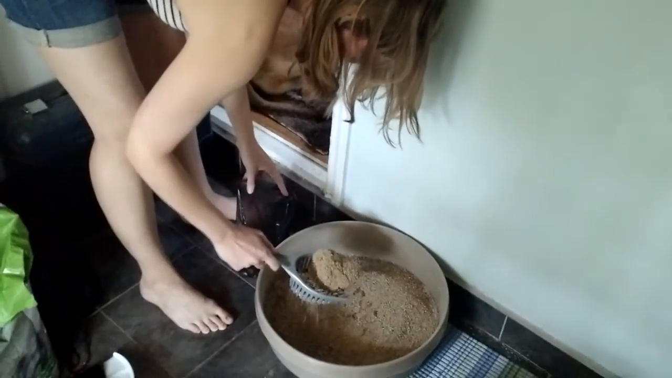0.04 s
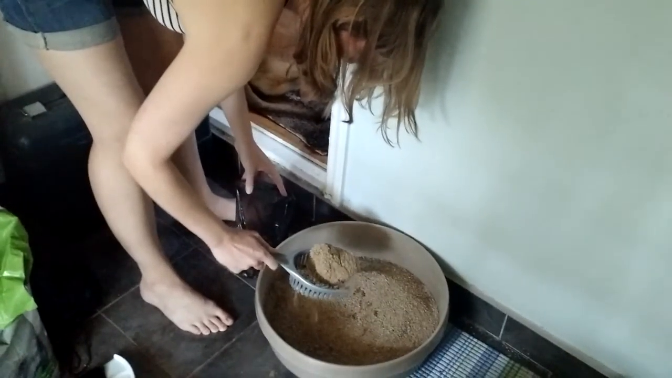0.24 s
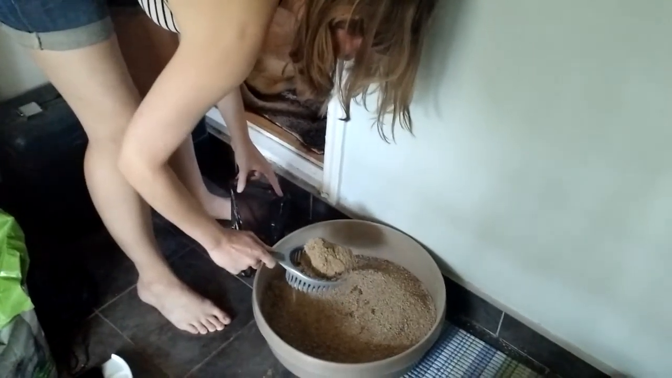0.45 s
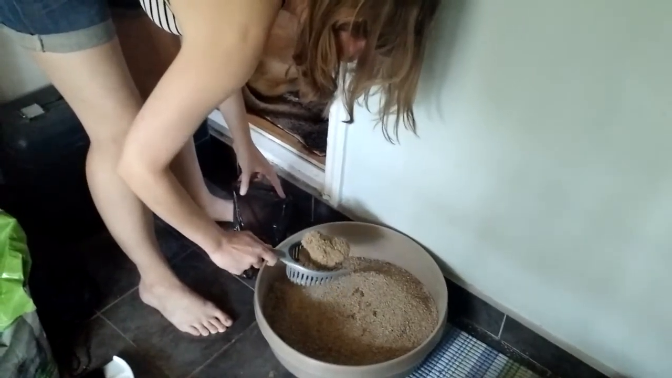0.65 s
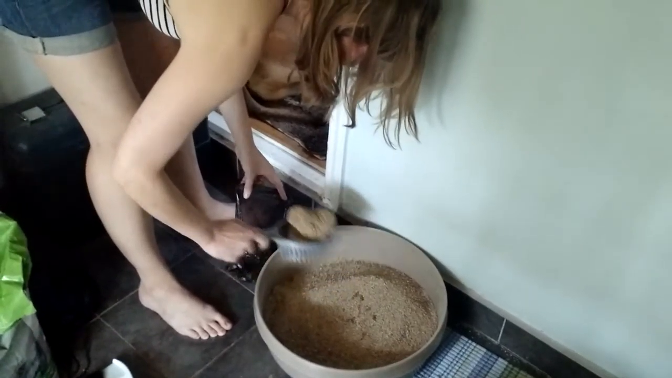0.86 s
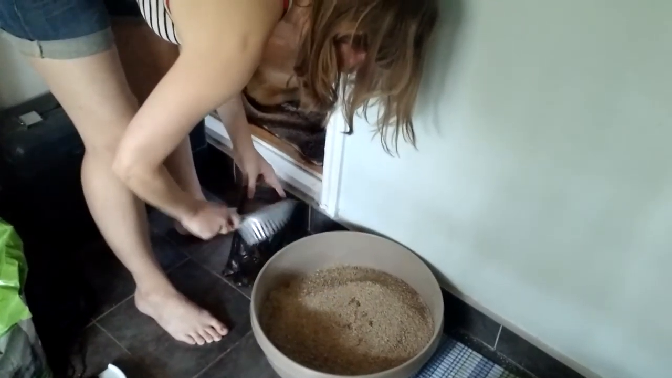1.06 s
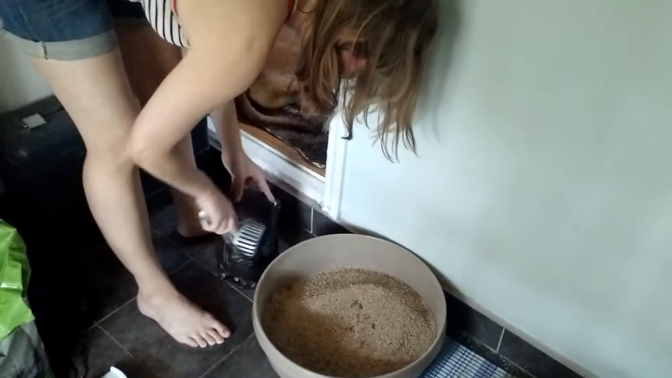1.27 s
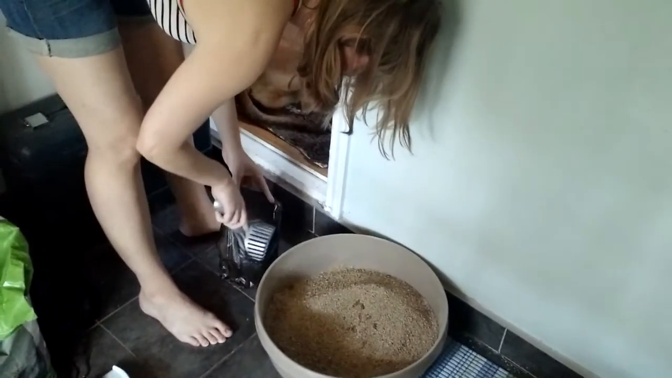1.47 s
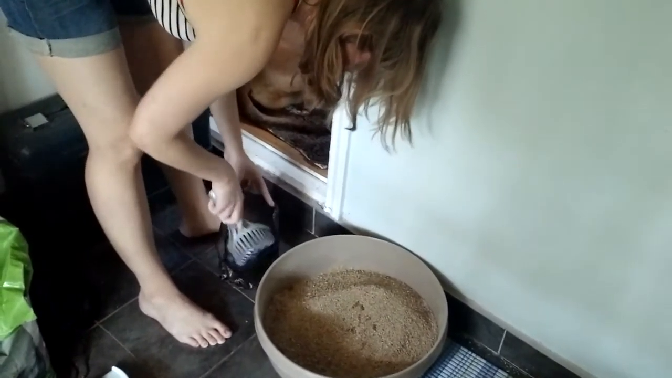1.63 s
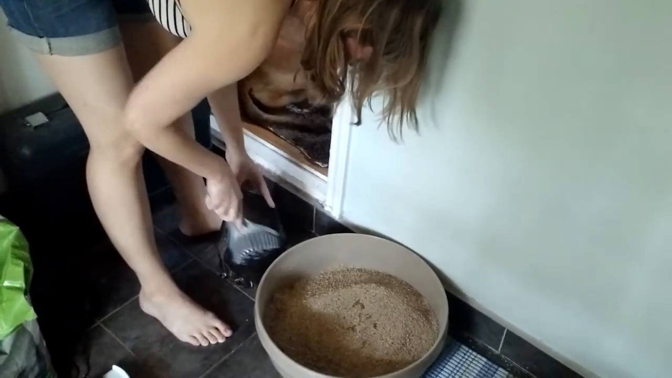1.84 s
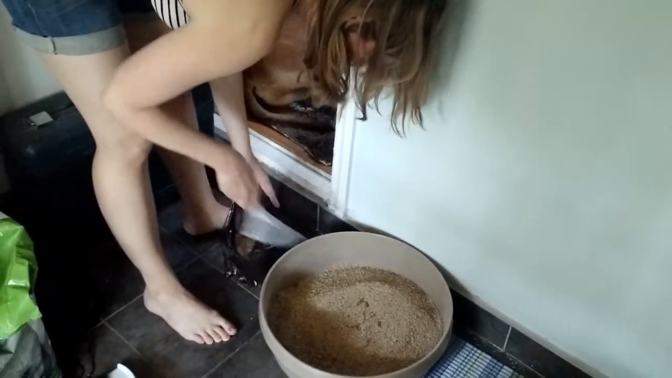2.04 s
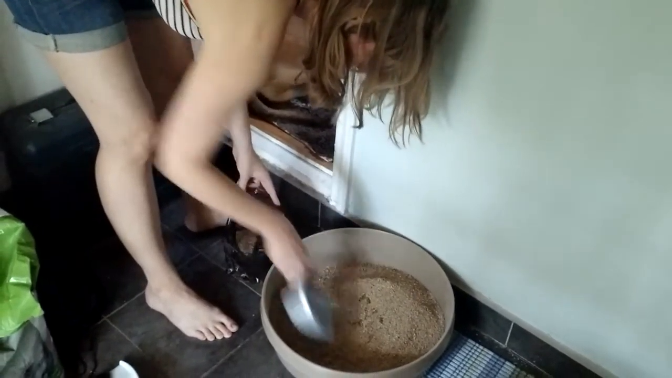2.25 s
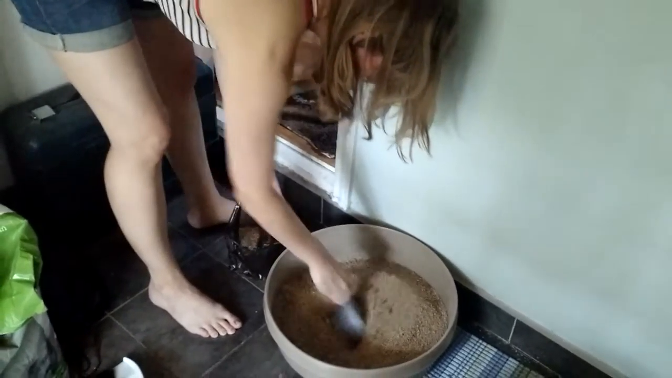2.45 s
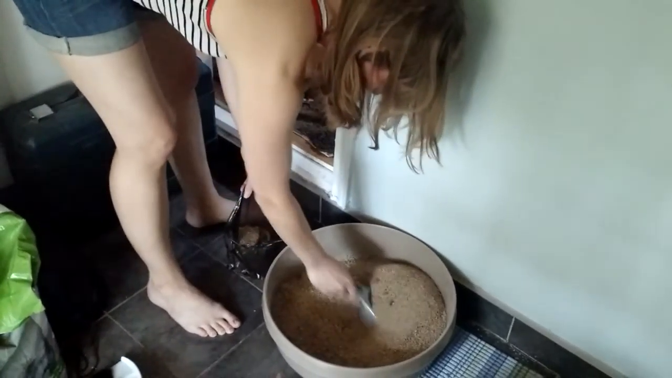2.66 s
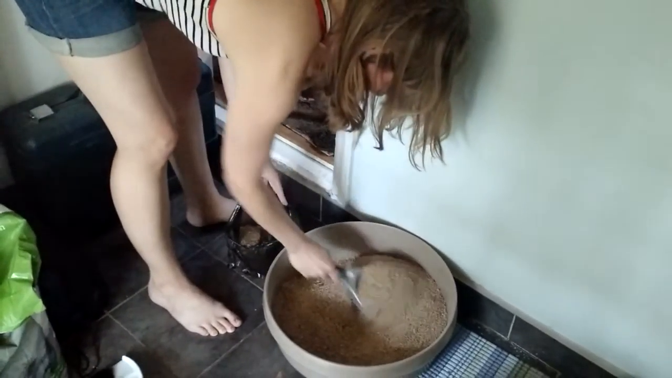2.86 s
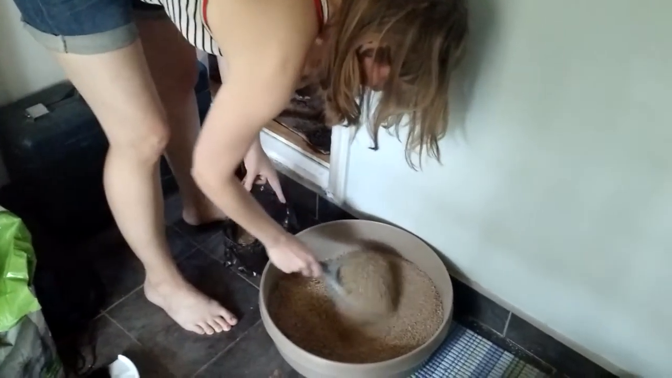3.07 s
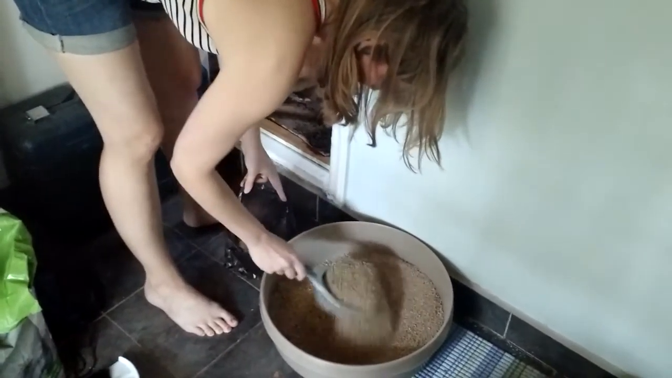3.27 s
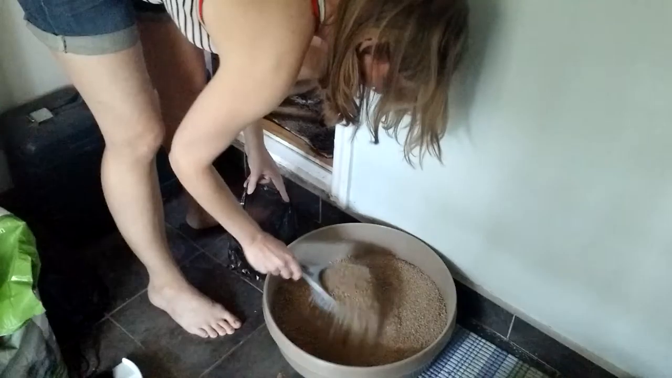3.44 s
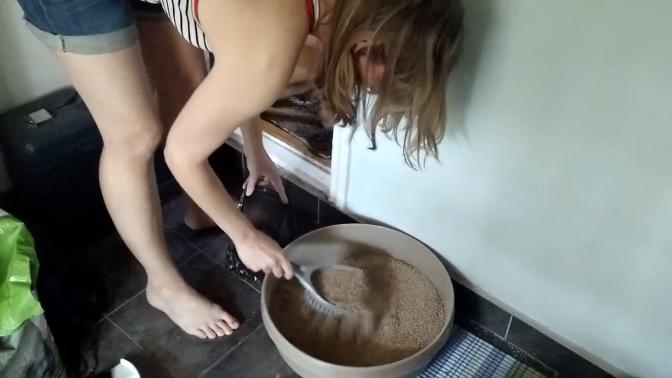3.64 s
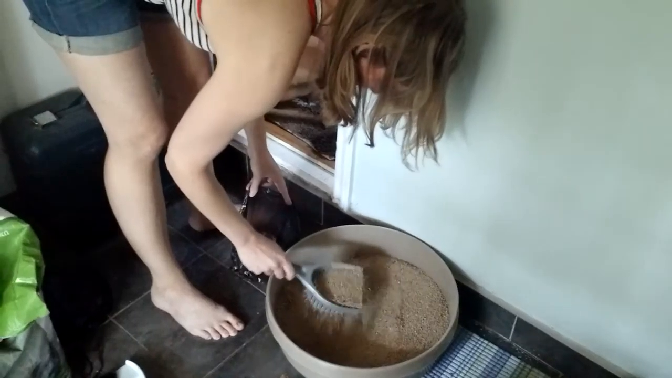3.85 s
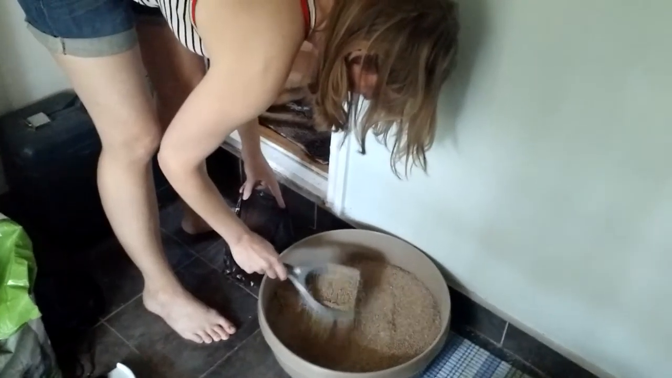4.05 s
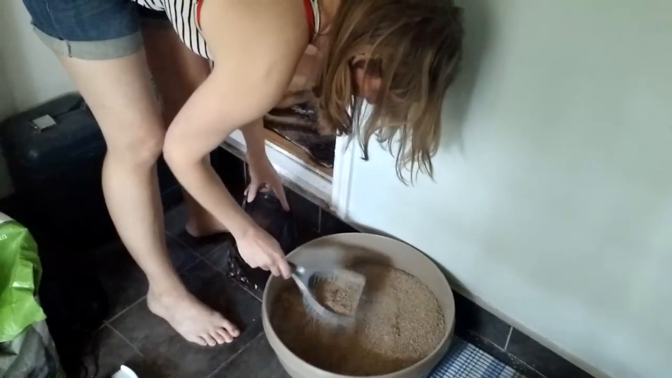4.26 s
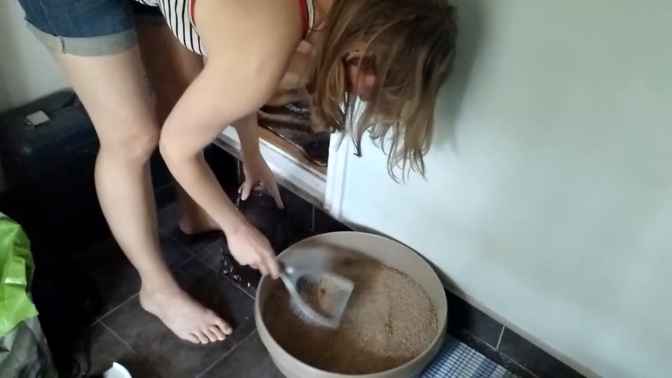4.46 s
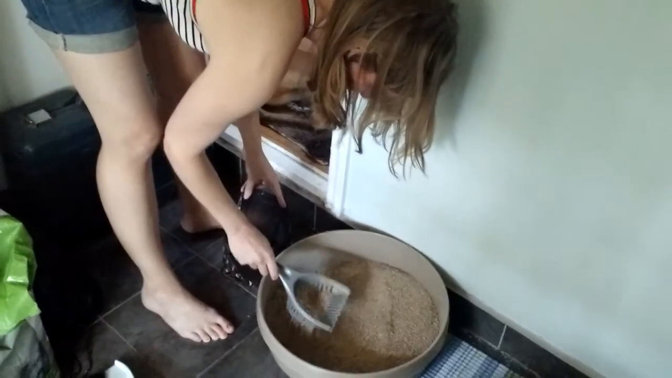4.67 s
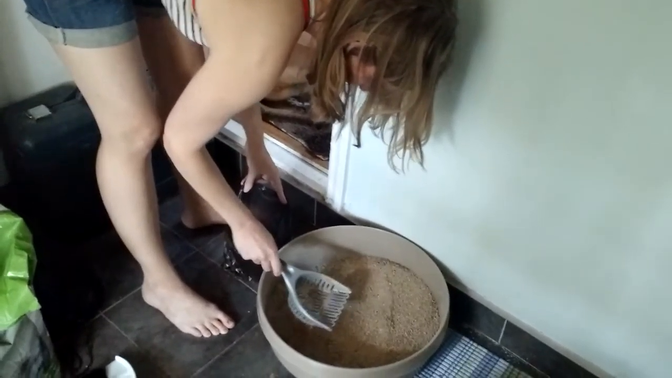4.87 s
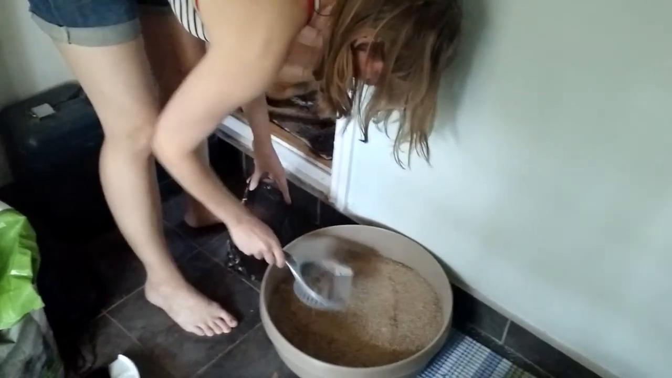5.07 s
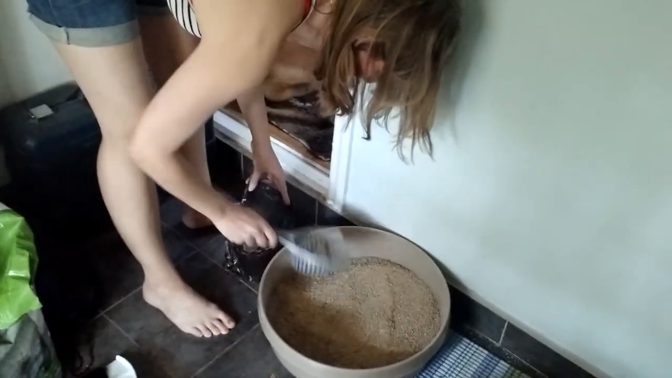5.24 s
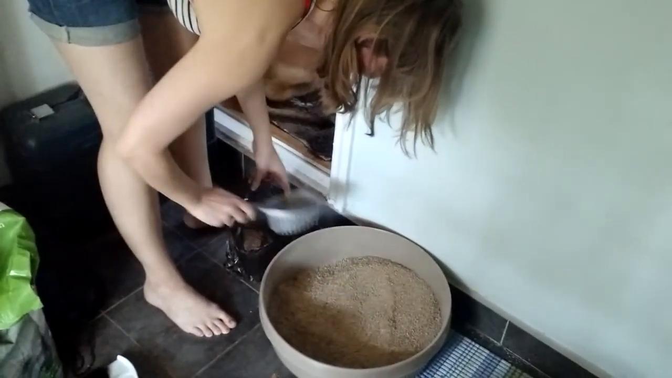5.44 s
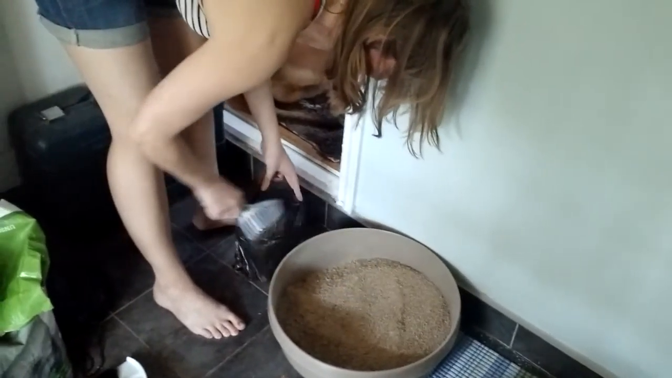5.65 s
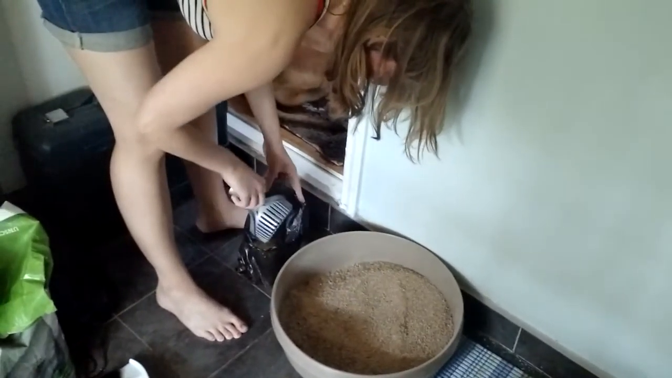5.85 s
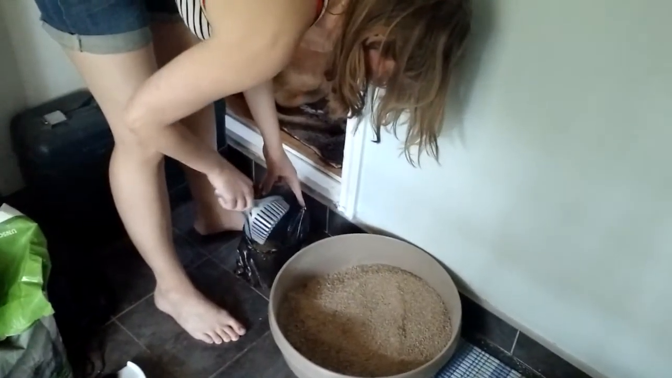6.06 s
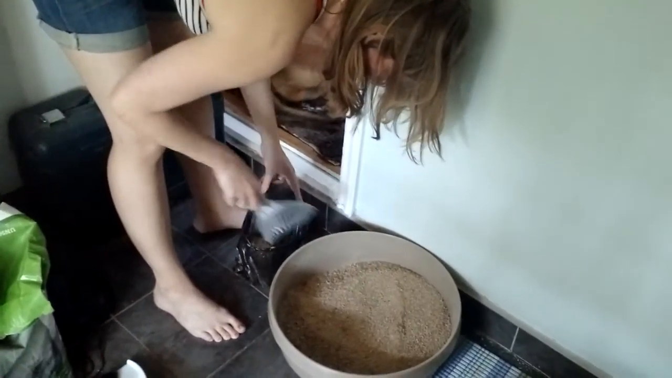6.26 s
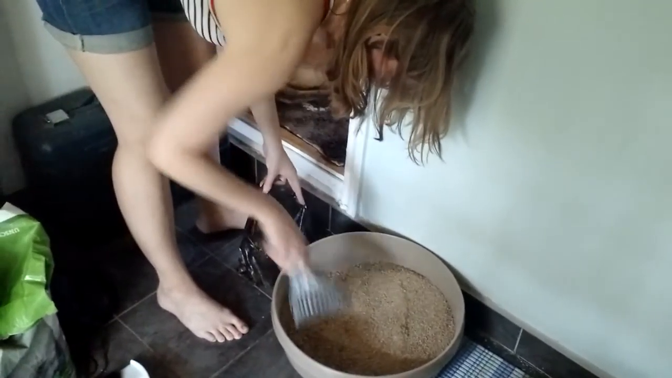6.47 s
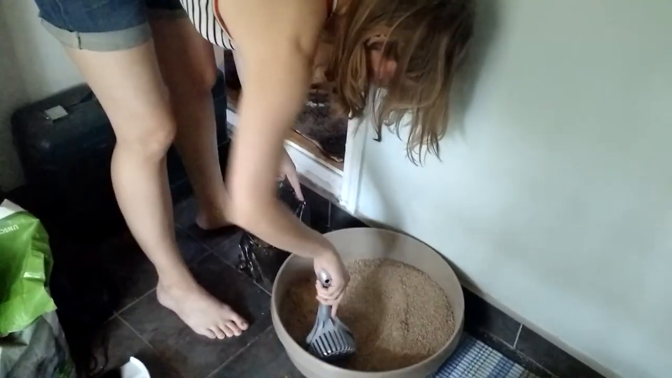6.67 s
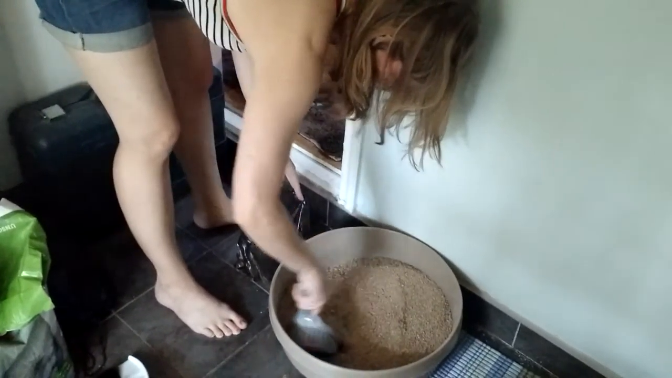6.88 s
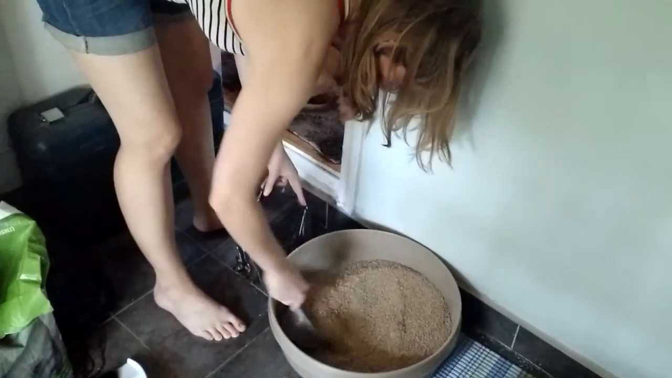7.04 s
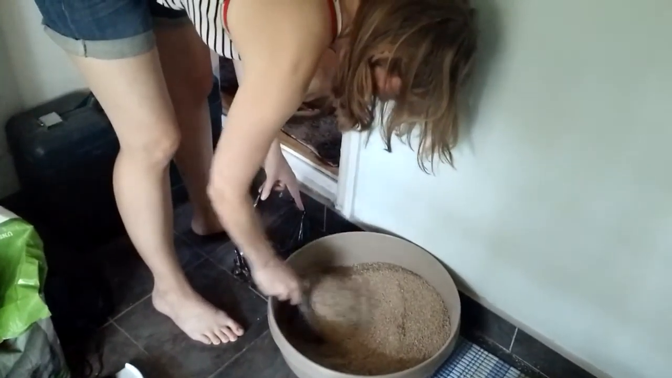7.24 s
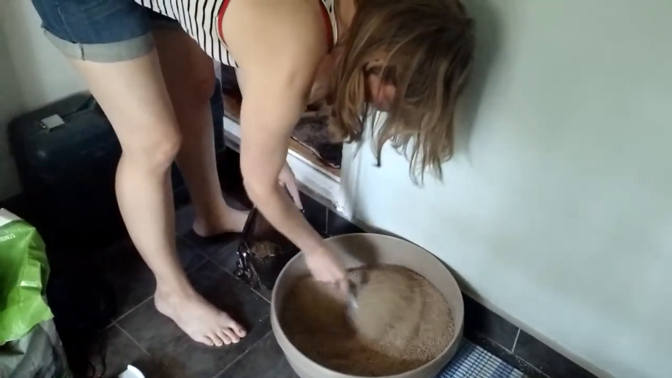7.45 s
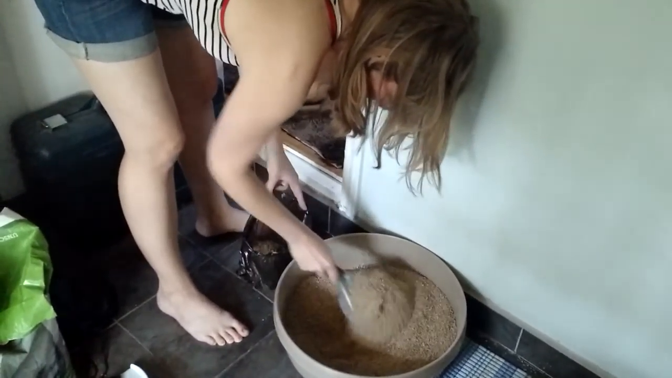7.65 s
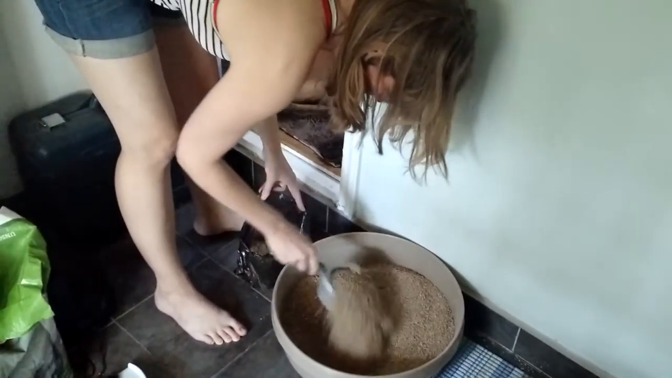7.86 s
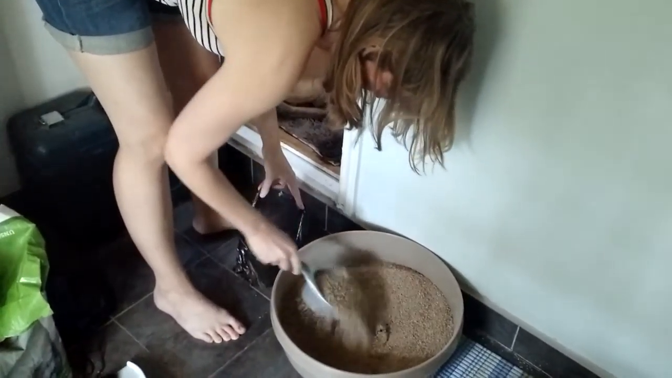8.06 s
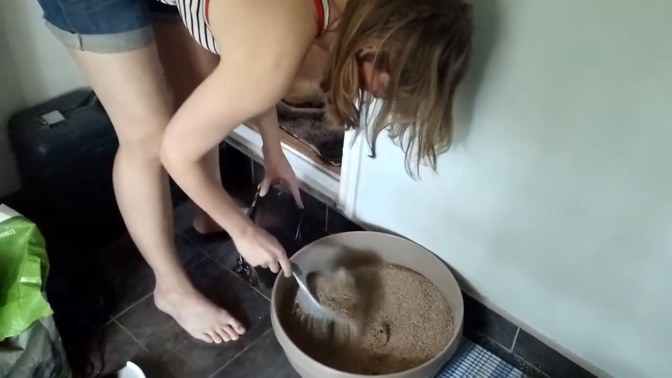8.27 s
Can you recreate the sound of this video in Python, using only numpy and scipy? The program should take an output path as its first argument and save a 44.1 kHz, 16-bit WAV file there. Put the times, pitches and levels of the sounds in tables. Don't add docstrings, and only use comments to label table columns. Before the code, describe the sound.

A slotted metal scoop works through a bowl of dry, coarse grains. Grit spills off in bright bursts, the edge cracks against the bowl and scrapes in, then quick wrist shakes make fine grains patter through the slots. After a lull the load is tipped out, and the scoop strikes and rakes the bed roughly. Near microphone, short dry indoor reflections, light background hiss.

```python
import sys
import numpy as np
from scipy import signal
from scipy.fft import rfft, irfft, next_fast_len
from scipy.io import wavfile

SR = 44100
rng = np.random.default_rng(int(sys.argv[2]) if len(sys.argv) > 2 else 0)


def wrap_up_sound(samples):
    columns = np.atleast_2d(samples).T
    tamed = np.clip(columns, -1, 1)
    steps = np.round(tamed * 32767).astype(np.int16)
    wavfile.write(sys.argv[1], SR, steps)


def volts_from_decibels(level):
    exponent = np.asarray(level, float) / 20
    return 10 ** exponent


N = 366471


def rms_one(x):
    return x / np.sqrt(np.mean(x ** 2) + 1e-20)


def at_hz(points, hz):
    points = np.array(points)
    return np.interp(np.log(hz), np.log(points[:, 0]), points[:, 1])


def drift(rate):
    step = 40
    r = np.exp(-2 * np.pi * step * rate / SR)
    noise = rng.standard_normal(N // step + 2002)
    slow = signal.lfilter([1], [1, -2 * r, r * r], noise)[2000:]
    return np.interp(np.arange(N) / step, np.arange(len(slow)), rms_one(slow))


def ring(clicks, hz, t60):
    r, w = volts_from_decibels(-60 / (t60 * SR)), 2 * np.pi * hz / SR
    return signal.lfilter([0, np.sin(w)], [1, -2 * r * np.cos(w), r * r], clicks + 1e-18)


def at_ports(common, apart, hz):
    # f/Hz, likeness (1 alike, -1 opposed)
    likeness = [(200, 1), (700, 1), (1400, 0.48), (2100, 0.037), (2700, 0.46), (3400, 0.43), (4200, -0.28),
                (6000, 0.088)]
    alike = np.clip(at_hz(likeness, hz), -1, 1)
    return np.sqrt(1 + alike) * common + np.sqrt(1 - alike) * apart * [[1], [-1]]


def grit(spectrum, per_s, uneven_db, cycles, clump_db, count):
    sizes_db = uneven_db * np.minimum(rng.exponential(1, (2, N)), 5)
    sizes = volts_from_decibels(sizes_db) * rng.choice([-1, 1], (2, N))
    collides = rng.random((2, N)) < per_s / SR
    hits = sizes * collides * volts_from_decibels(clump_db * drift(12.2))
    pitch_index = rng.integers(0, count, (2, N))
    out = 0
    for k, hz in enumerate(np.geomspace(spectrum[0][0], spectrum[-1][0], count)):
        common, apart = ring(hits * (pitch_index == k), hz, cycles / hz)
        out = out + volts_from_decibels(at_hz(spectrum, hz)) * hz * at_ports(common, apart, hz)
    return rms_one(out)


def surges(rows, mix_db, lean, t):
    s, db, rise, fall, colour_db = np.transpose(rows)[:, :, None]
    span = np.maximum(np.where(t < s, rise, fall), .004)
    roundness = 1.24
    power = volts_from_decibels(db - 20 * np.abs((t - s) / span) ** roundness) ** 2
    size_db = np.array(mix_db)[:, None] + np.outer(lean, colour_db)
    return volts_from_decibels(size_db) ** 2 @ power


def hiss():
    # f/Hz, level/dB per Hz
    noise_density = [(8, -9), (17, 0), (35, -5.5), (47, -19), (57, -9), (95, -24), (125, -16.5),
                     (152, -24.5), (200, -22.5), (450, -27), (1000, -40), (2500, -48), (6000, -38.5),
                     (16000, -42)]
    hz = np.maximum(np.arange(N // 2 + 1) * SR / N, 1)
    white = rfft(rng.standard_normal((2, N)))
    return volts_from_decibels(-52) * rms_one(irfft(white * volts_from_decibels(at_hz(noise_density, hz)), N))


def settling():
    stir_db = [-72.5, -73, -82, -88]
    return volts_from_decibels(np.array(stir_db)[:, None]) ** 2


def pouring(t):
    # t/s of the peak, level/dB, rise/s, fall/s, coarseness/dB
    slides = [(0.1, -69, 0.33, 1, -3), (0.34, -58, 0.11, 0.16, -5), (0.86, -56.5, .1, 0.43, -9),
              (1.035, -36.5, 0.048, 0.26, -1), (1.155, -33.5, 0.16, 0.17, 5),
              (1.36, -42.5, 0.35, 0.16, 0.5), (1.55, -48.5, 0.45, 0.3, 2), (1.68, -42.5, 0.12, 0.058, -3.5),
              (1.75, -42.5, 0.11, 0.16, -2.5), (1.84, -49.5, 0.25, 0.32, 1), (2.1, -63, 0.053, 0.18, 11.5),
              (3.0, -57, 0.41, 0.066, -24), (3.2, -54, 0.16, 0.32, 2), (4.76, -61, 0.061, 0.48, 7),
              (5.3, -70, 0.16, 0.12, 1), (5.38, -68, 0.037, 0.38, -7), (5.544, -43, 0.077, 0.17, 2),
              (5.635, -43, 0.28, 0.47, 7), (6.02, -57, 0.29, 0.22, 0), (6.19, -58, 0.067, 0.043, 0),
              (6.372, -52, 0.21, 0.16, 3), (7.82, -56.5, .07, 0.72, -7), (8.2, -61, 1, 0.28, 3),
              (8.31, -51.5, 0.086, .1, 5)]
    share_db = [-13.5, -7, -0.6, -2.56]
    lean = [0.87, 0.15, 0.009, 0.009]
    return surges(slides, share_db, lean, t)


def crunching_grit():
    # f/Hz, level/dB per Hz
    density = [(200, -9.5), (300, -18.5), (450, -1.5), (1000, -6), (1700, -1.5), (2400, -3), (3200, -4)]
    # f/Hz, bandwidth/Hz, level/dB
    rubbed_modes = [(330.3, 14, -4.5), (462, 18, -1), (575.6, 40, 0), (642.8, 4.7, -5), (955, 26, -6.5),
                    (1100, 63, -20), (1180, 38, -19), (1380, 24, -13), (1633, 23, -9.5), (1734, 6.7, -3.5),
                    (1974, 8.4, -7)]
    coarse = grit(density, per_s=5000, uneven_db=2.0, cycles=10.3, clump_db=2.6, count=16)
    bass_cut = signal.butter(4, 185, "high", fs=SR, output="sos")
    coarse = signal.sosfilt(bass_cut, coarse)
    hum = 0
    for hz, width, db in rubbed_modes:
        t60 = np.log(1000) / np.pi / width
        hum = hum + volts_from_decibels(db + 3.7 * drift(7.8)) * rms_one(ring(coarse, hz, t60))
    return rms_one(coarse + volts_from_decibels(-16.0) * hum)


def rasping_grit():
    # f/Hz, level/dB per Hz
    density = [(1800, -37), (2600, 0.5), (3600, 7), (4500, 9), (5500, 2)]
    return grit(density, per_s=9000, uneven_db=0.0, cycles=16.8, clump_db=2.03, count=11)


def pattering_grit():
    # f/Hz, level/dB per Hz
    density = [(4200, -9.5), (5300, 2), (6300, 2.5), (7400, -7), (9000, -11)]
    return grit(density, per_s=14000, uneven_db=0.0, cycles=30.4, clump_db=1.36, count=11)


def dusting_grit():
    # f/Hz, level/dB per Hz
    density = [(7500, 5), (9000, 3.5), (10500, 3.5), (12500, 3), (14500, -2.5), (16000, -34)]
    return grit(density, per_s=20000, uneven_db=2.0, cycles=27.0, clump_db=1.25, count=8)


def knocks(spray):
    # t/s, peak level/dB, spray t60/s, crack level/dB, ring level/dB
    blows = [(0.149, -74, 0.043, -15, -11), (2.107, -53, 0.05, -9, -12), (2.26, -64, 0.011, -11, -24),
             (2.373, -32, 0.05, -4, -30), (2.4643, -30, 0.033, 7.5, -16), (2.681, -57, 0.045, -8, -14),
             (2.785, -42.5, 0.053, 5.5, -24), (2.841, -41, 0.076, -1, -29.5),
             (3.365, -52.5, 0.044, -15, -20), (3.573, -58, 0.054, -9, -19), (4.607, -44, 0.063, -19, -16),
             (6.529, -25.5, 0.088, -3, -6.5), (6.537, -32, 0.027, -22, -7), (7.199, -34, 0.02, 7, -16),
             (7.233, -36.5, 0.031, -13, 0.5), (7.318, -34, 0.054, -11, -5.5), (8.012, -45, 0.045, -11, -12)]
    # f/Hz, level/dB, t60/s
    struck_modes = [(742, -6, 0.32), (1460, -19, 0.047), (2020, -14, 0.13), (3210, -5, 5.0),
                    (3620, -17, 0.13), (4014, 0, 0.25), (4730, -41, 5.0), (5600, -14, 0.26)]
    length = 6000
    out, click, t = np.zeros((2, N)), np.eye(1, length)[0], np.arange(length) / SR
    strength_db = rng.normal(0, 1.5, (len(blows), len(struck_modes)))
    crack = ring(click, 1760, 0.0041) + 0.24 * ring(click, 4200, .002) + 0.14 * ring(click, 225, 0.011)
    for (s, db, t60, crack_db, ring_db), own_db in zip(blows, strength_db):
        start = round(s * SR)
        span = slice(start, start + length)
        tone = 0
        for (hz, level, decay), own in zip(struck_modes, own_db):
            tone = tone + volts_from_decibels(level + own) * ring(click, hz, min(decay, .07))
        fade = volts_from_decibels(-60 * t / max(t60, .005))
        blow = volts_from_decibels(ring_db) * tone + volts_from_decibels(crack_db) * crack + volts_from_decibels(-14.0) * fade * spray[:, span]
        out[:, span] += volts_from_decibels(db) * blow
    return signal.sosfilt(signal.butter(2, 160, "high", fs=SR, output="sos"), out)


def shaking():
    # t/s, swell level/dB
    flicks = [(1.499, 3), (1.571, 3.5), (1.85, 2.2), (2.847, 4.5), (3.241, 2), (3.32, -3), (3.401, 4),
              (3.487, 5.5), (3.587, 7), (3.704, 7), (3.802, 5.5), (3.918, 7.5), (4.014, 5.5), (4.109, 5.5),
              (4.216, 4.5), (4.3, 6.5), (4.393, 3), (4.501, 1.5), (4.565, 1.5), (4.66, -0.7), (5.55, 1.5),
              (5.642, 2.5), (6.612, 2)]
    t, swell_db = np.arange(0, N, 32) / SR, 0
    for s, db in flicks:
        span_s = np.where(t < s, .023, 0.028)
        steepness = np.where(t < s, 5.2, 3.1)
        swell_db = swell_db + 1.15 * db * np.exp(-.5 * np.abs((t - s) / span_s) ** steepness)
    return np.interp(np.arange(N) / SR, t, swell_db)


def pushing(t):
    # t/s of the peak, level/dB, rise/s, fall/s, brightness/dB
    strokes = [(2.263, -59.5, 0.0029, 0.9, 22), (2.375, -32.5, 0.077, .07, 0.5),
               (2.415, -36, .06, 0.14, -0.5), (2.475, -33, 0.021, 0.063, -6), (2.5, -41.5, 0.14, 0.27, -12),
               (2.85, -49.5, 0.22, 0.15, -1), (2.92, -58, 0.078, 0.05, -2), (3.585, -53, 0.017, 0.1, -1),
               (6.55, -39, 0.019, 0.054, -2.5), (6.615, -34, 0.046, 0.095, -6),
               (6.705, -38, 0.075, 0.14, 1), (6.77, -38, 0.096, 0.12, -5.5), (6.87, -41.5, 0.25, 0.28, 5),
               (7.01, -41.5, .25, 0.13, 9.5), (7.15, -43, 0.4, .15, 1), (7.223, -33.5, .09, 0.045, -2),
               (7.25, -45.5, .05, 0.14, 9), (7.297, -36, 0.084, 0.075, -5), (7.33, -38.5, .08, .15, -1),
               (7.41, -46.5, .2, 0.11, 9), (7.6, -57, 0.27, 0.43, 7.5), (8.02, -57.5, 0.041, 0.47, 5.5)]
    share_db = [-4, -7.5, -7, -13]
    lean = [0.0068, 0.97, 0.93, 1]
    return surges(strokes, share_db, lean, t)


def sifting(t):
    share_db = [-41, -8, 1.1, -2.7]
    from_s, to_s, edge_s = 3.14, 4.64, 0.13
    outside = np.maximum(np.maximum(from_s - t, t - to_s), 0)
    flow_db = -58.5 + 0.93 * (t - from_s) - 20 * outside / edge_s
    return volts_from_decibels(flow_db + np.array(share_db)[:, None]) ** 2


def work():
    t = np.arange(0, N + 32, 32) / SR
    power = settling() + pouring(t) + pushing(t) + sifting(t)
    return [np.interp(np.arange(N) / SR, t, np.sqrt(p)) for p in power]


def room(x):
    t60_s, wall_cut_hz = 0.19, 5000
    size = next_fast_len(N + SR)
    hz = np.maximum(np.arange(size // 2 + 1) * SR / size, 1)
    dull = 1 / (1 + 1j * hz / wall_cut_hz)
    echoes = []
    for lags in rng.uniform(.007, .03, (2, 5)):
        total = 0
        for k, lag in enumerate(lags):
            loop = volts_from_decibels(-60 * lag / t60_s) * dull * np.exp(-2j * np.pi * hz * lag)
            total = total + loop / (1 - loop) * (-1) ** k
        echoes.append(total)
    common, apart = echoes
    return irfft(rfft(x.mean(axis=0), size) * at_ports(common, apart, hz), size)[:, :N]


def scene():
    crunching, rasping, pattering, dusting = work()
    swell_db = shaking()
    crunch, rasp, patter, dust = crunching_grit(), rasping_grit(), pattering_grit(), dusting_grit()
    bowl = crunching * volts_from_decibels(0.24 * swell_db) * crunch
    bowl = bowl + rasping * volts_from_decibels(1.0 * swell_db) * rasp
    bowl = bowl + pattering * volts_from_decibels(1.08 * swell_db) * patter
    bowl = bowl + dusting * volts_from_decibels(1.4 * swell_db) * dust
    bowl = bowl + knocks(crunch + 0.31 * rasp + 0.66 * patter + 0.11 * dust)
    return bowl + volts_from_decibels(-14.0) * room(bowl) + hiss()


def low_pass(x):
    return signal.sosfilt(signal.butter(12, 16310, fs=SR, output="sos"), x)


def record(dry):
    # f/Hz, left minus right level/dB
    balance = [(200, -0.3), (4500, 0), (6500, -2), (8000, -5.5), (11000, -4.5), (13000, -2), (14500, 5.5)]
    # f/Hz, level/dB
    feed = [(25, -14), (60, -10), (125, -14), (300, -11), (700, -4), (1330, -.4), (2700, -.2), (4000, -2.2),
            (5400, -8), (7000, -8.5), (10000, -11.5), (13000, -15), (15000, -20)]
    # f/Hz, lag/s
    feed_lag = [(1330, .000375), (2700, .000377), (4000, .000375), (7000, .000359), (11400, .000351),
                (14000, .000357)]
    top_hz = 15500
    size = next_fast_len(N + 4096)
    hz = np.maximum(np.arange(size // 2 + 1) * SR / size, 1)
    shade = volts_from_decibels(at_hz(balance, hz) / 2)
    left, right = rfft(dry, size) * [shade, 1 / shade] * (hz < top_hz)
    delay = np.exp(-2j * np.pi * hz * at_hz(feed_lag, hz))
    cross = volts_from_decibels(np.minimum(at_hz(feed, hz), 0)) * delay
    wide = irfft(np.array([left - cross * right, right - cross * left]), size)[:, :N]
    return low_pass(wide)


dry = scene()
out = record(dry)
wrap_up_sound(out)
```